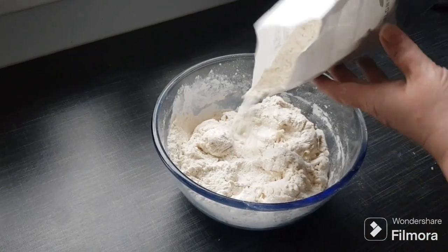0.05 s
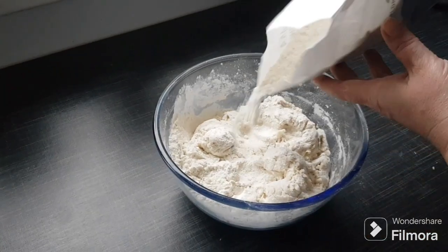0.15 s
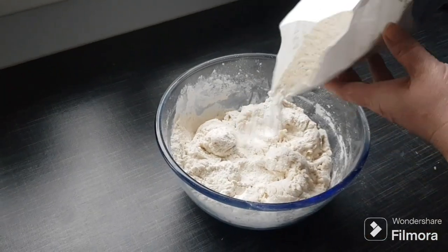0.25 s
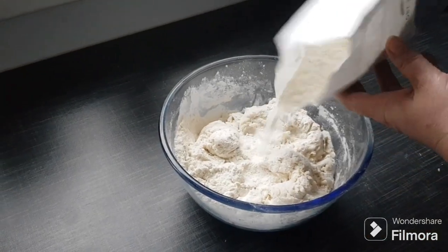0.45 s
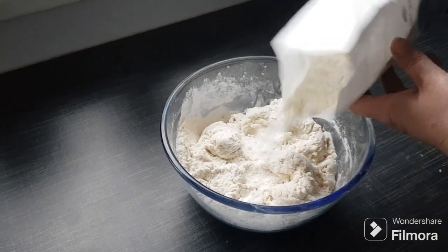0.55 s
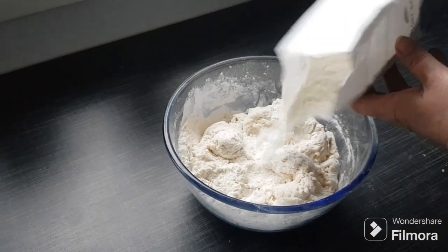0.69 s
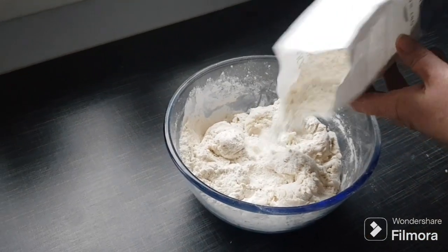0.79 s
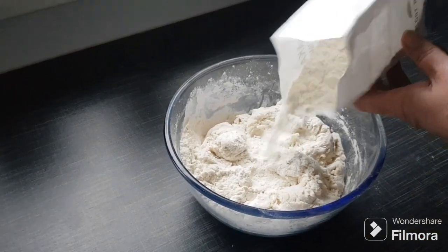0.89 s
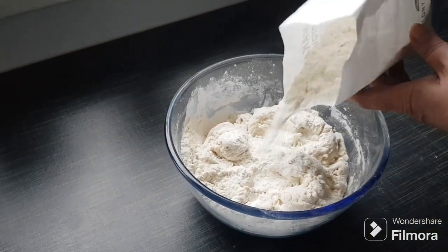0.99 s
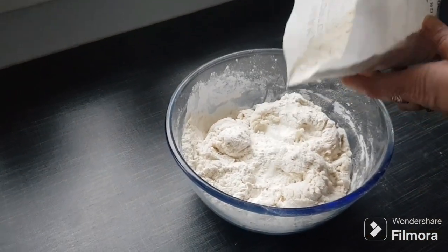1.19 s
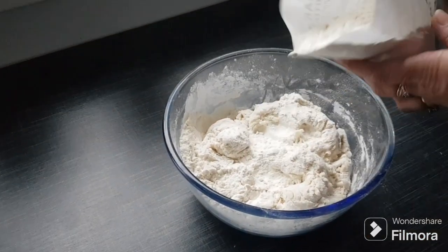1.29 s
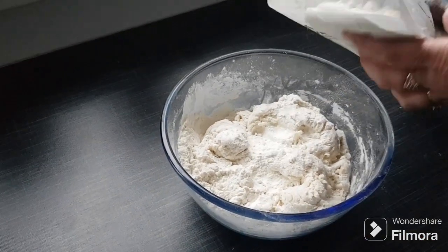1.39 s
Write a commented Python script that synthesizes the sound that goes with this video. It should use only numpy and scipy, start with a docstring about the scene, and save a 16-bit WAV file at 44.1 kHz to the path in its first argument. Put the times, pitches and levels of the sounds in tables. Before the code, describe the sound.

A paper bag buckles with a sharp double knock and a few duller pops as flour is shaken into a bowl. The flour then slides out with a faint grainy hiss and soft thuds, close by in a small kitchen.

```python
"""In a small kitchen, flour is shaken from a paper bag into a glass bowl.
The bag buckles with one sharp double knock and several duller pops, each an impulse that excites
the modes of the bag and of the panel that flipped. Flour slides over the paper with a faint, grainy
friction hiss, and lumps land on the heap in soft thuds. The room reverberates briefly."""
import sys
import numpy as np
from scipy import signal
from scipy.io import wavfile

SR = 44100
rng = np.random.default_rng(int(sys.argv[2]) if len(sys.argv) > 2 else 0)


def master_out(mix):
    """Clip the mix to full scale and print it as 16-bit PCM to the path in sys.argv[1]."""
    frames = np.transpose(np.atleast_2d(mix))
    ceiling = np.clip(frames, -1, 1)
    pcm = np.round(ceiling * 32767).astype(np.int16)
    wavfile.write(sys.argv[1], SR, pcm)


N = 63945
TIME = np.arange(N) / SR

# envelope of the flour sliding over the paper: (time [s], level [dB])
SLIDE_ENVELOPE = [(0, -58.5), (.08, -66), (.13, -72.5), (.18, -60.5), (.26, -75), (.5, -59.5), (.6, -82.5),
                  (.703, -80), (.716, -54.5), (.755, -52.5), (.785, -59.5), (.85, -51), (.908, -59.5),
                  (.945, -49), (1.0, -52), (1.04, -56.5), (1.15, -64.5), (1.185, -51.5), (1.235, -54),
                  (1.29, -73), (1.32, -60), (1.45, -54)]


def bag_pops():
    """Snap-through buckling: each pop clicks, crackles and excites the modes of bag and flipped panel."""
    # buckles, levels relative: (time [s], level [dB], panel frequency [Hz], panel level [dB],
    # panel T60 [s], treble edge [Hz], crackle level [dB], room send [dB])
    buckles = [(0.1757, -24, 1196, 5.5, 0.013, 1750, 7, 4), (0.1765, -33, 388, 3.5, 0.083, 550, -8, 11.5),
               (0.2030, -12, 337, -3.5, 0.053, 1680, -21, -6.5),
               (0.2045, -12, 443, -7, 0.042, 1630, 2.5, -15.5),
               (0.2062, -14.5, 985, 0, 0.03, 1880, 5, -0.5),
               (0.2750, -11.5, 970, 5.5, 0.0094, 3660, 13, -1.5),
               (0.2768, -1, 1688, -1.5, 0.018, 13900, -2, -3.5),
               (0.2781, 2, 977, -4, 0.046, 9200, -8.5, -2.5), (0.2833, -7.5, 1390, 0, 0.007, 2700, -13, -1),
               (0.3236, -13.5, 1700, 16.5, 0.0066, 2600, -17, -22),
               (0.3247, -1.5, 1394, -0.5, 0.0071, 2630, -5, -16.5),
               (0.3265, -18.5, 550, 0, 0.06, 2500, 19, -1.5), (0.483, -18.5, 1150, -3, 0.012, 2670, 1, -6),
               (0.5017, -29.5, 400, 0.5, 0.059, 1580, 12.5, 1), (0.511, -30, 1500, 4, 0.0097, 1980, 7, -10),
               (0.9215, -29.5, 605, 3.5, 0.016, 750, 11, 4.5),
               (1.1225, -38.5, 1106, 16, .013, 1390, -9, -2.5),
               (1.2238, -27.5, 1040, 7, 0.015, 2100, 14, -2.5)]
    # modes of the filled bag: (frequency [Hz], level [dB], T60 [s])
    bag_modes = [(215, -33.5, 0.048), (318, -14.5, 0.029), (532, -20, 0.051), (836, -24, 0.019),
                 (1540, -16, 0.016), (1703, -20, 0.036), (2038, -11.5, 0.04), (2767, -15, 0.013),
                 (4525, -2.5, 0.005), (8480, -5.5, 0.003), (12250, 5, 0.0014)]
    pop_db, click_db, left_lag_s = -14.5, -16, 0.00009
    direct = np.zeros((2, N))
    room_sends = np.zeros((3, 2, N))  # the pops face three ways, each with its own room response
    body = sum(from_db(db) * damped_mode(hz, t60) for hz, db, t60 in bag_modes)
    body[0] += from_db(click_db)
    for k, (start, db, hz, panel_db, t60, edge_hz, crackle_db, room_db) in enumerate(buckles):
        crackle = from_db(crackle_db) * butterworth(noise_burst(decay_s=0.0033), 850, "high")
        snap = butterworth(body + crackle, edge_hz, "low", order=3)
        panel = from_db(panel_db) * paper_panel(hz, t60)
        # light paper radiates little bass
        pop = from_db(pop_db + db) * butterworth(snap + panel, 260, "high")
        mix_in(direct, start, pop)
        mix_in(room_sends[k % 3], start, from_db(room_db) * pop)
    direct[0] = np.interp(TIME - left_lag_s, TIME, direct[0])
    return direct + sum(kitchen_reverb(send) for send in room_sends)


def paper_panel(hz, t60):
    """Damped free vibration of a flipped panel, whose frequency wavers as its tension shifts."""
    cycles = hz * np.cumsum(1 + 0.04 * drift(rate_hz=90)) / SR
    return np.sin(2 * np.pi * cycles) * decay(t60) * onset(rise_s=0.00034)


def paper_ticks():
    """Vibration scales with size: the smaller the crease that gives way, the higher and shorter its tick."""
    # creases giving way: (time [s], level [dB], centre frequency [Hz])
    creases = [(0.7735, -38, 2100), (0.7965, -41, 1250), (0.8032, -33, 7800), (0.828, -37, 3700),
               (0.841, -37, 1400), (1.171, -41, 1350)]
    decay_cycles, width_octaves = 7, 1.8
    ticks = np.zeros((2, N))
    for start, db, hz in creases:
        edges_hz = hz * 2 ** (np.array([-0.5, 0.5]) * width_octaves)
        tick = butterworth(noise_burst(decay_cycles / hz), edges_hz, "band")
        mix_in(ticks, start, from_db(db) * tick)
    return pan(ticks, right_db=7) + from_db(-12) * kitchen_reverb(ticks)


def sliding_flour():
    """Friction noise: grains rub along the paper in many tiny contacts."""
    # friction spectrum: (frequency [Hz], relative level [dB])
    spectrum = [(200, -38), (500, 6.5), (850, -13.5), (1300, 1.5), (2200, 1.5), (4500, -0.5), (10000, -3),
                (14000, -4)]
    return envelope(SLIDE_ENVELOPE) * hiss(spectrum, flutter_db=0.85, flutter_hz=24.6, grainy=True)


def fine_powder():
    """Incoherent addition: the sounds of the finest particles merge into a high hiss."""
    # envelope of the hiss: (time [s], level [dB])
    flow = [(0, -96), (.142, -66), (.152, -54.5), (.19, -62), (.26, -61), (.56, -67), (.66, -59),
            (.695, -65), (.73, -51), (.8, -76), (1.45, -58)]
    # powder spectrum: (frequency [Hz], relative level [dB])
    spectrum = [(1500, -45), (4000, -1), (8000, -7), (12000, 5), (15000, -7)]
    return envelope(flow) * hiss(spectrum, flutter_db=2.25, flutter_hz=30.0, grainy=True)


def landing_stream():
    """Soft impacts carry little treble: the stream patters on the heap as low noise."""
    # envelope of the patter: (time [s], level [dB])
    flow = [(0, -49.5), (.09, -61), (.14, -71.5), (.24, -58), (.53, -53.5), (.6, -62), (.69, -69),
            (.725, -59.5), (.85, -57.5), (.95, -57.5), (1.22, -58.5), (1.45, -65)]
    # impact spectrum: (frequency [Hz], relative level [dB])
    spectrum = [(40, -15.5), (90, -1), (150, -6), (245, 0.5), (370, -5.5), (520, -7.5), (1000, -12),
                (2000, -18.5), (5000, -46)]
    patter = envelope(flow) * hiss(spectrum, flutter_db=2.0, flutter_hz=30.4)
    return patter * from_db([[-1.1], [0.9]])  # slightly to the right


def lump_thuds():
    """Inelastic impact: each lump lands on the heap with one low, heavily damped tone."""
    # landings: (time [s], level [dB], frequency [Hz])
    landings = [(0.012, -40, 234), (0.058, -38, 230), (0.104, -50, 132), (0.279, -33, 213.6),
                (0.285, -38, 88), (0.715, -43.5, 197), (0.741, -42, 261), (0.797, -42.5, 103),
                (0.832, -48.5, 230), (0.921, -38, 100)]
    thuds = np.zeros((2, N))
    for start, db, hz in landings:
        mix_in(thuds, start, from_db(db) * damped_mode(hz, t60=0.055) * onset(rise_s=0.0028))
    return thuds


def paper_crinkles():
    """Impulse excitation: random clicks ring short paper resonances while the flour slides."""
    clicks_per_s, t60_cycles = 140, 4.5
    modes_hz = np.geomspace(900, 4500, num=10)
    crinkles = np.zeros((2, N))
    for hz in modes_hz:
        struck = rng.random(N) < clicks_per_s / len(modes_hz) / SR
        clicks = struck * (2 * rng.random((2, N)) - 1)
        crinkles += signal.fftconvolve(clicks, damped_mode(hz, t60_cycles / hz)[None], axes=1)[:, :N]
    return from_db(-10) * envelope(SLIDE_ENVELOPE) * unit_rms(crinkles)


def kitchen_reverb(x):
    """Convolution with a room response: early worktop reflections, then a tail that decays band by band."""
    # reverberation time: (frequency [Hz], T60 [s])
    decay_times = [(150, 0.32), (400, 0.25), (1000, 0.41), (2800, 0.34), (7000, 0.36), (14000, 0.25)]
    # initial spectrum of the diffuse tail: (frequency [Hz], relative level [dB])
    spectrum = [(100, 4), (400, -1), (1000, -0.5), (2000, 0), (5000, 2), (14000, 3.5)]
    tail = sum(band * from_db(at_hz(spectrum, hz) - 60 * TIME / at_hz(decay_times, hz))
               for hz, band in stereo_bands(rng.standard_normal((2, 2, N))))
    tail *= onset(rise_s=0.0089)
    early = butterworth(noise_burst(decay_s=0.0049), 600, "high") * onset(rise_s=0.0049)
    response = (from_db(-0.82) * unit_rms(tail) + from_db(-3) * unit_rms(early)) / np.sqrt(N)
    return signal.fftconvolve(x, response, axes=1)[:, :N]


def room_background():
    """Ambient noise floor: a faint low rumble under a fainter hiss."""
    # background spectrum: (frequency [Hz], relative spectral density [dB])
    spectrum = [(25, -9), (36, -32), (49, 11), (65, -20), (120, -8.5), (300, -13.5), (700, -14.5),
                (2500, -39), (14000, -27.5)]
    noise = hiss(spectrum, flutter_db=-2.3, flutter_hz=13)
    return from_db(-66) * butterworth(noise, 37.6, "high", order=4)


def hiss(spectrum, flutter_db, flutter_hz, grainy=False):
    """Amplitude modulation: noise bands flutter together and singly; grains add shot noise. Unit rms."""
    noise = rng.standard_normal((2, 2, N))
    if grainy:
        grains_per_s, grain_gain = 1700, 0.17
        sizes = from_db(-23 * np.minimum(rng.exponential(1, N), 4))
        grains = sizes * (rng.random(N) < grains_per_s / SR)
        noise += grain_gain * unit_rms(grains) * rng.standard_normal((2, 2, N))
    common = drift(flutter_hz)
    return unit_rms(sum(band * from_db(at_hz(spectrum, hz) + flutter_db * (common + drift(flutter_hz)))
                        for hz, band in stereo_bands(noise)))


def stereo_bands(noise_pairs):
    """Partial coherence: mid and side noise mix in half-octave bands; yields (centre [Hz], band)."""
    # likeness of left and right: (frequency [Hz], correlation [-1 to 1])
    correlations = [(60, 0.71), (300, 0.88), (600, 0.43), (1000, 0.06), (12000, -0.0066)]
    edges = 22 * 2 ** (np.arange(20) / 2)
    for k, (low, high) in enumerate(zip(edges, edges[1:])):
        mid, side = butterworth(noise_pairs[k % 2], [low, high], "band")
        hz = np.sqrt(low * high)
        alike = at_hz(correlations, hz)
        yield hz, np.sqrt(1 + alike) * mid + np.sqrt(1 - alike) * side * [[1], [-1]]


def drift(rate_hz):
    """Low-passed noise: a slow random fluctuation of about unit rms."""
    hop, warm_up = 40, 2000
    pole = np.exp(-2 * np.pi * rate_hz * hop / SR)
    white = rng.standard_normal(N // hop + warm_up + 2)
    slow = signal.lfilter([1], [1, -2 * pole, pole * pole], white)[warm_up:]
    return np.interp(np.arange(N) / hop, np.arange(len(slow)), unit_rms(slow))


def damped_mode(hz, t60):
    """Impulse response of a damped harmonic oscillator."""
    return np.sin(2 * np.pi * hz * TIME) * decay(t60)


def noise_burst(decay_s):
    """Stereo white noise under an exponential decay."""
    return rng.standard_normal((2, N)) * np.exp(-np.minimum(TIME / decay_s, 40))


def decay(t60):
    """Exponential decay by 60 dB in t60 seconds."""
    return from_db(-np.minimum(60 * TIME / t60, 300))


def onset(rise_s):
    """Exponential approach to full amplitude."""
    return 1 - np.exp(-TIME / rise_s)


def envelope(points):
    """Gain at every sample, interpolated from (time [s], level [dB])."""
    return from_db(np.interp(TIME, *np.transpose(points)))


def at_hz(points, hz):
    """Interpolation on a logarithmic frequency axis."""
    frequencies, values = np.transpose(points)
    return np.interp(np.log(hz), np.log(frequencies), values)


def butterworth(x, hz, kind, order=2):
    """Filter with a maximally flat passband."""
    sections = signal.butter(order, np.clip(hz, 10, 0.45 * SR), kind, fs=SR, output="sos")
    return signal.sosfilt(sections, x + 1e-18)


def pan(x, right_db):
    """Level difference between the channels: right exceeds left by right_db."""
    return x * from_db([[-right_db / 2], [right_db / 2]])


def mix_in(out, start_s, x):
    """Superpose x on out from start_s."""
    i = int(start_s * SR)
    out[..., i:] += x[..., :N - i]


def from_db(db):
    """Decibels to amplitude ratio."""
    return 10 ** (np.asarray(db) / 20)


def unit_rms(x):
    """Normalise to unit rms."""
    return x / np.sqrt(np.mean(x ** 2) + 1e-20)


def scene():
    """Linear superposition of bag, flour and room."""
    impacts = lump_thuds() + paper_crinkles()
    background = room_background()
    reflections = from_db(-4) * kitchen_reverb(impacts)
    pour = impacts + reflections + sliding_flour() + fine_powder() + landing_stream()
    return bag_pops() + paper_ticks() + pan(pour, right_db=1) + background


def record(dry):
    """Band limiting: a steep low-pass removes the highest treble."""
    stopband_hz = 14950
    return signal.sosfilt(signal.cheby2(18, 60, stopband_hz, fs=SR, output="sos"), dry)


dry = scene()
out = record(dry)
master_out(out)
```